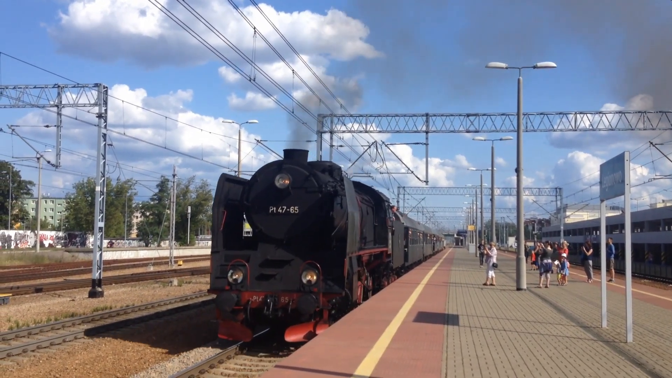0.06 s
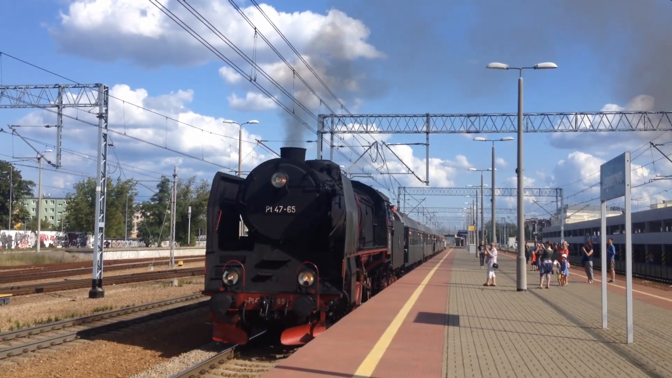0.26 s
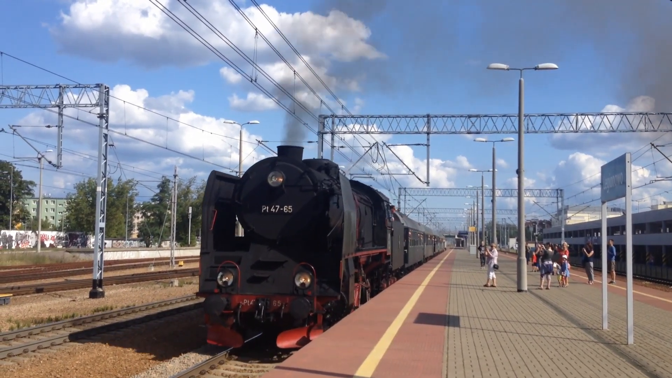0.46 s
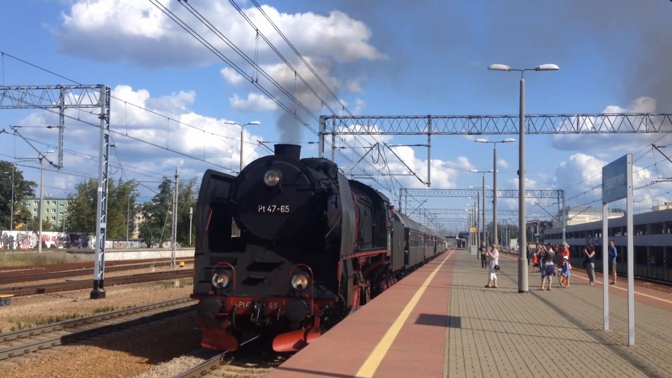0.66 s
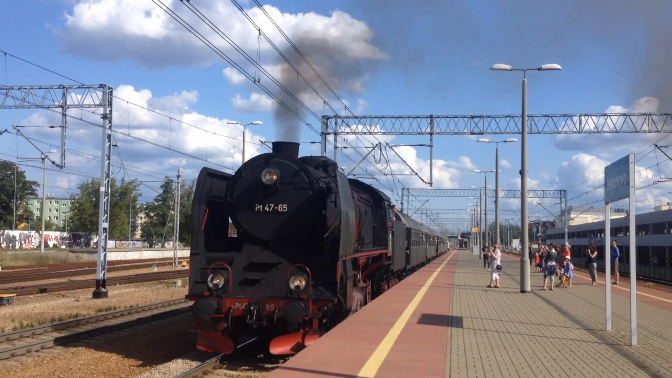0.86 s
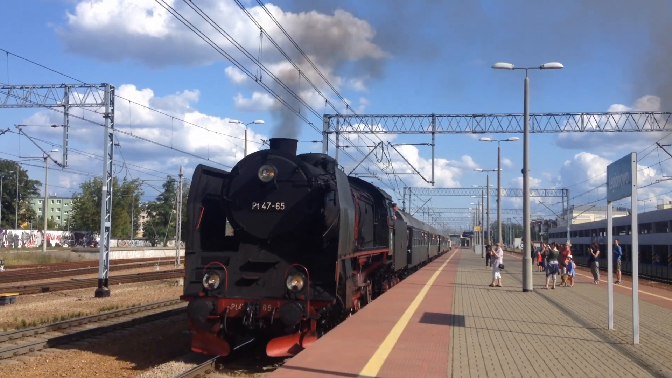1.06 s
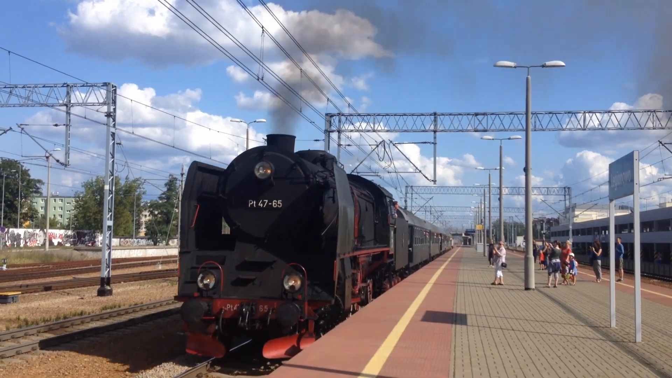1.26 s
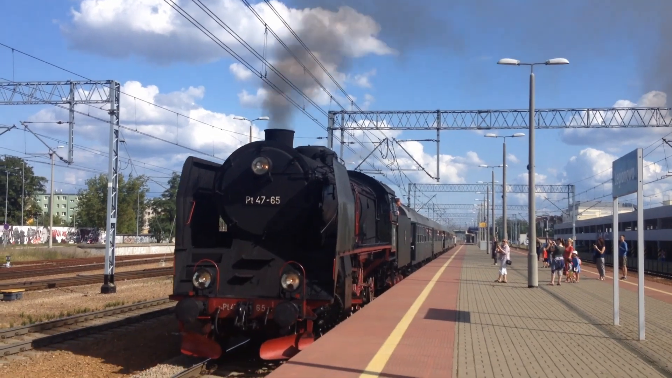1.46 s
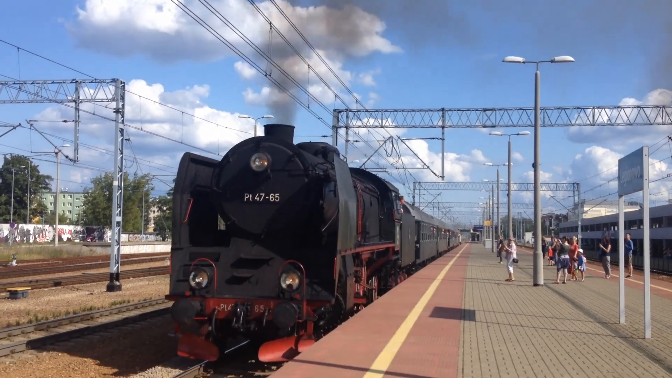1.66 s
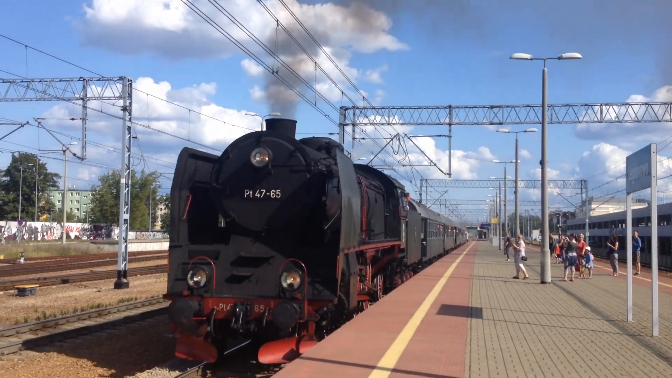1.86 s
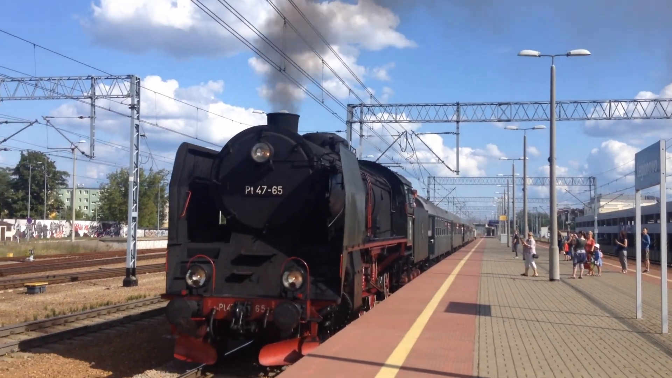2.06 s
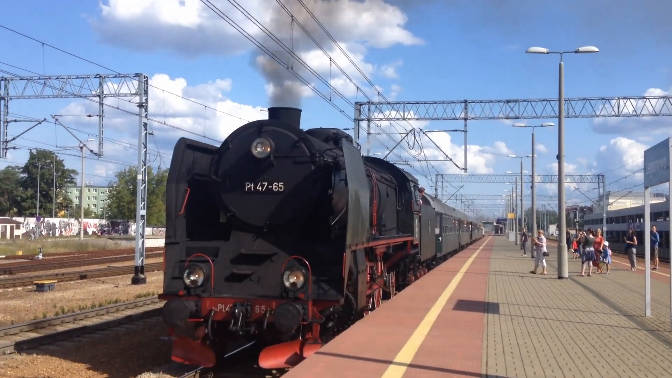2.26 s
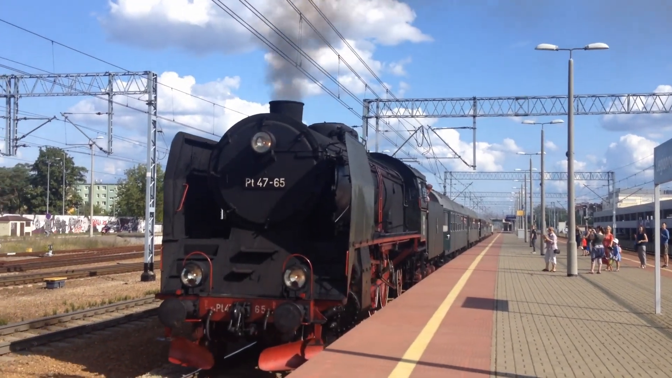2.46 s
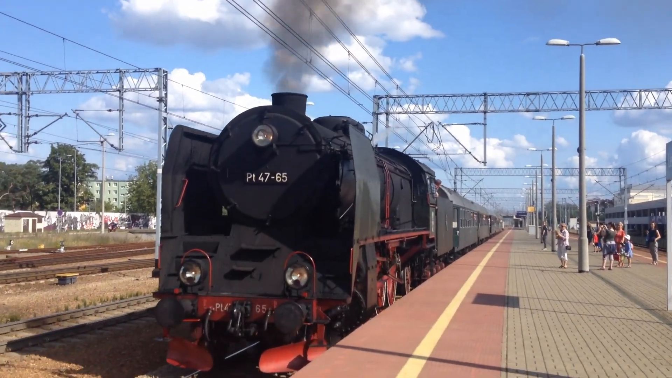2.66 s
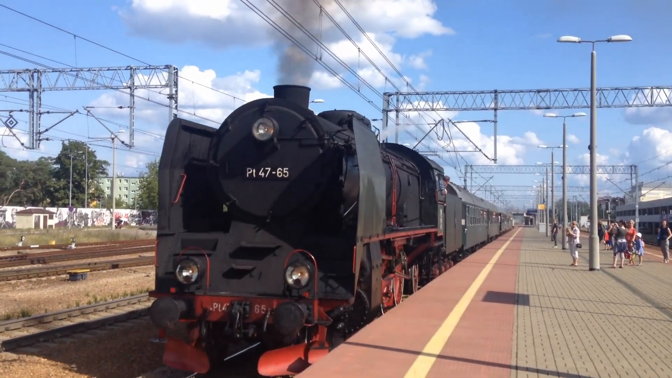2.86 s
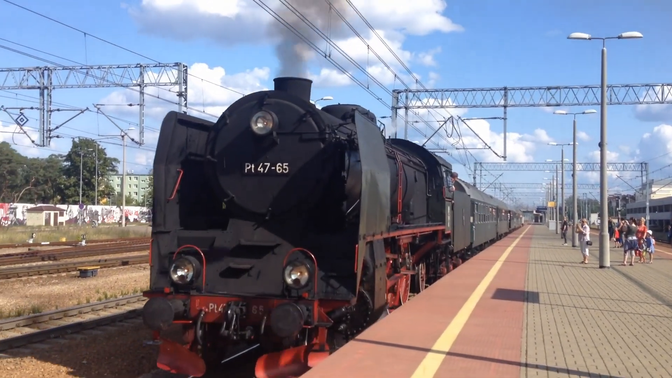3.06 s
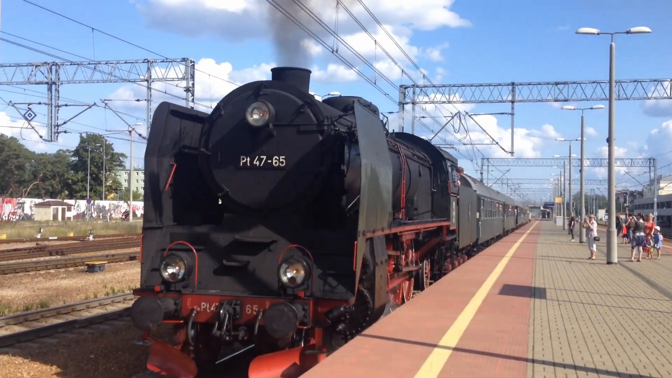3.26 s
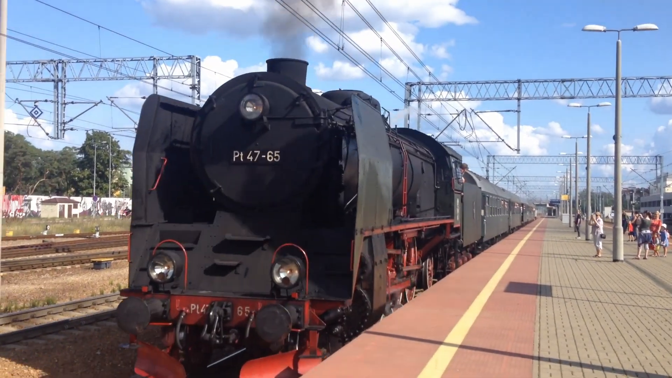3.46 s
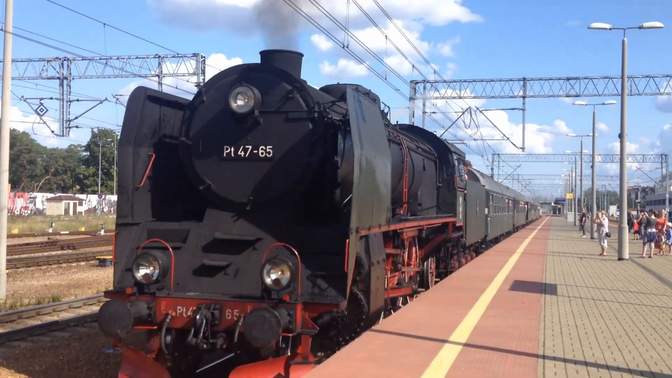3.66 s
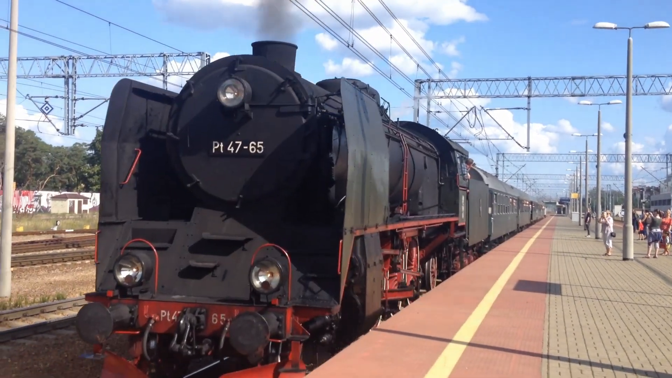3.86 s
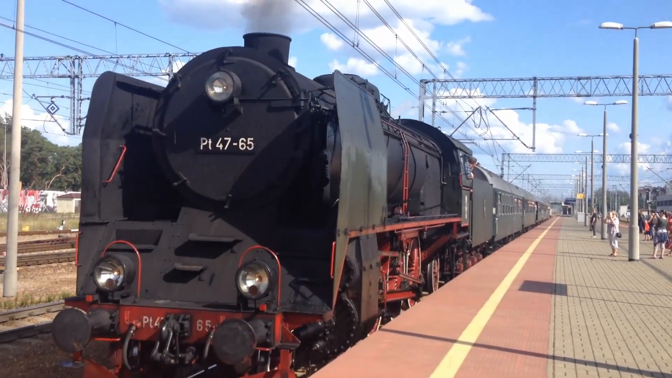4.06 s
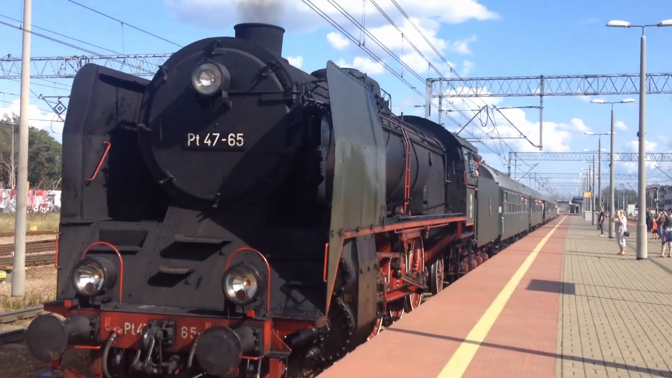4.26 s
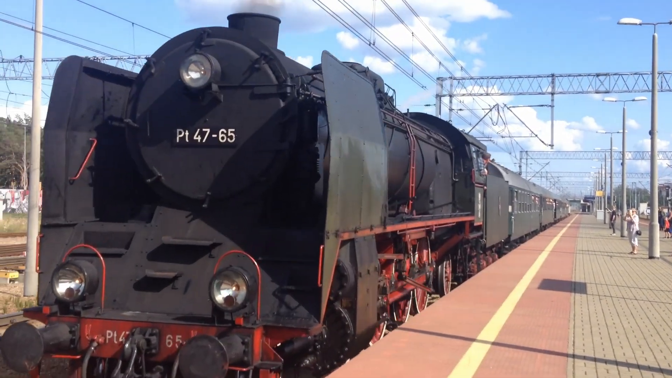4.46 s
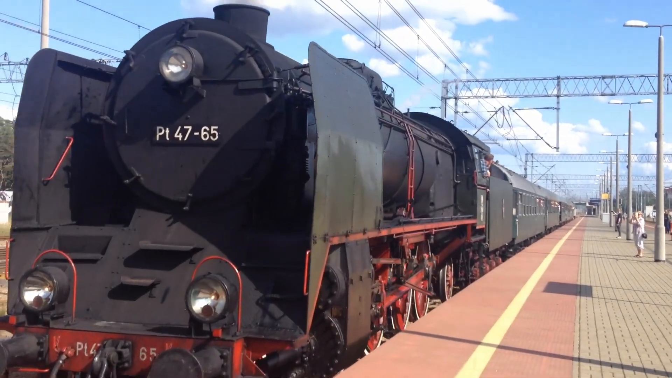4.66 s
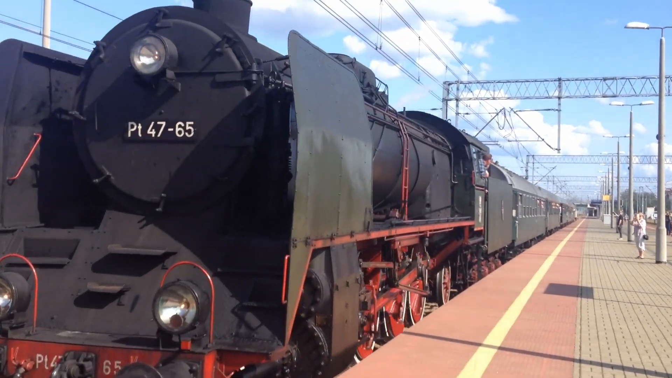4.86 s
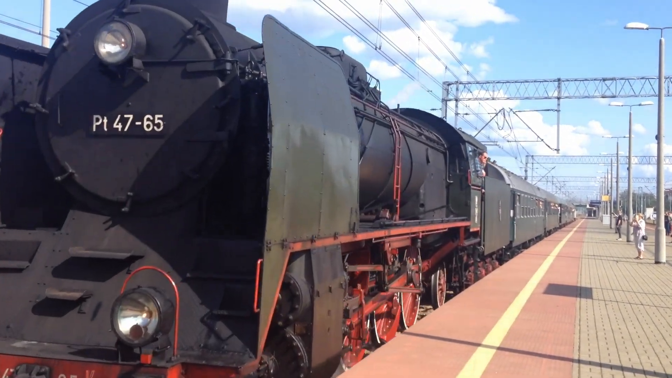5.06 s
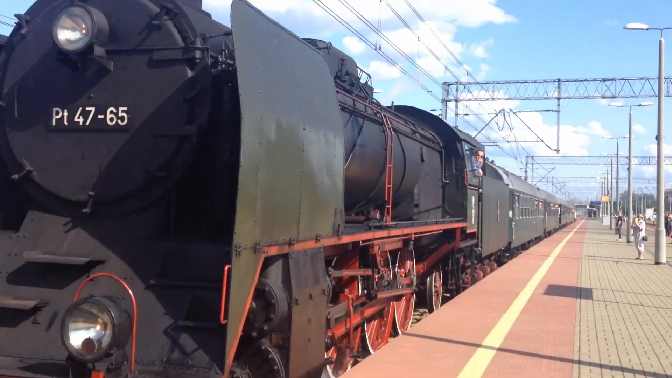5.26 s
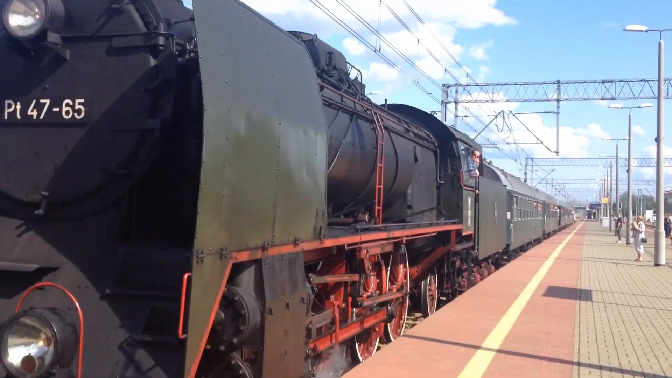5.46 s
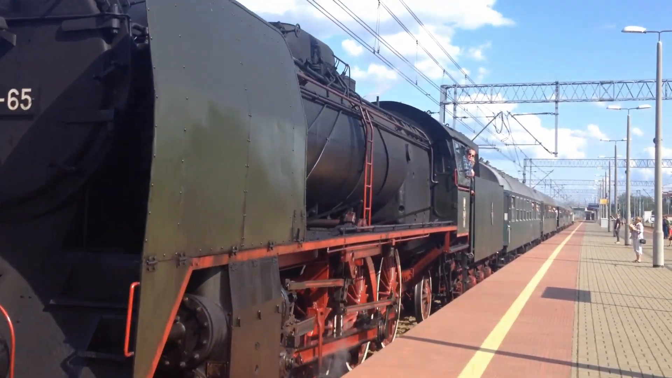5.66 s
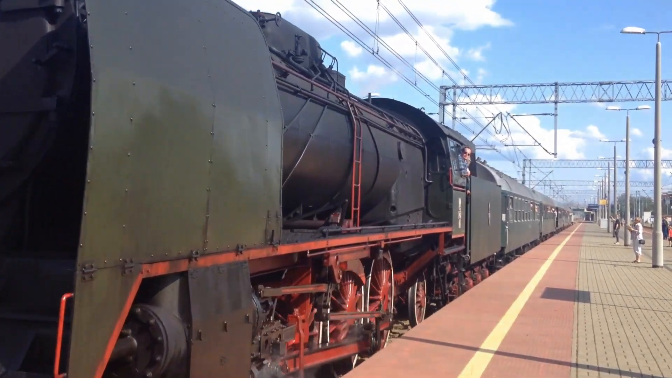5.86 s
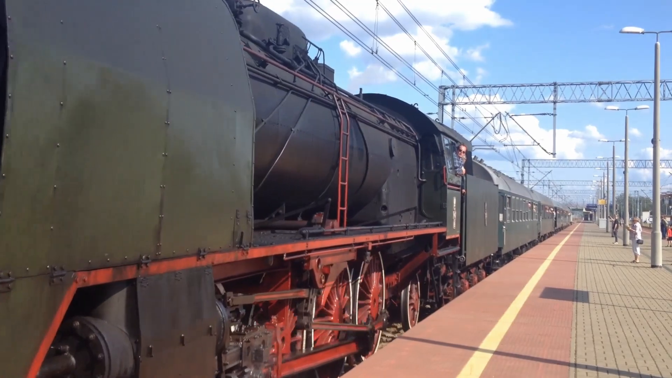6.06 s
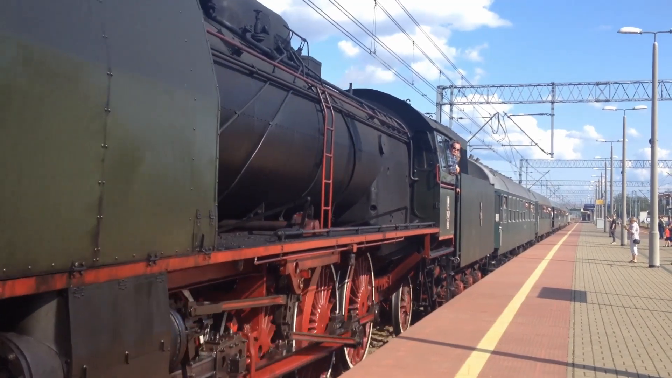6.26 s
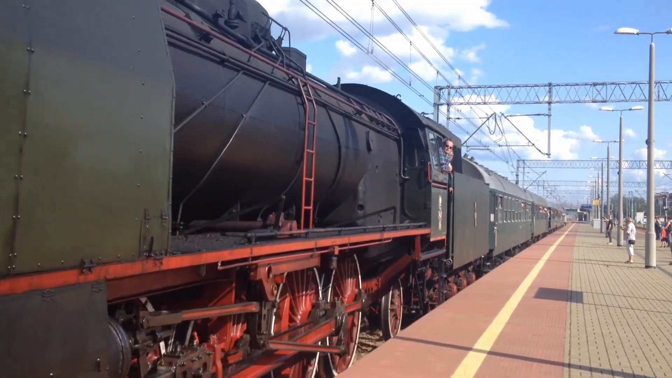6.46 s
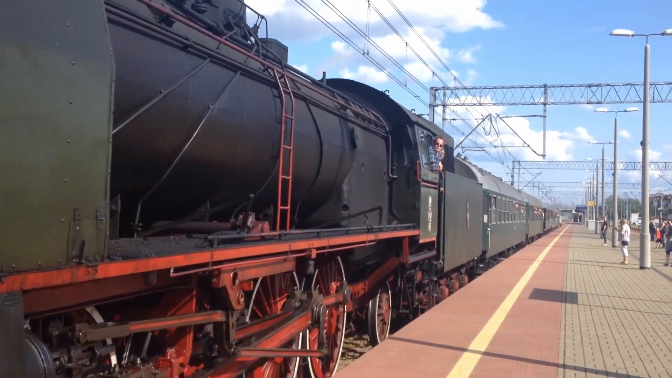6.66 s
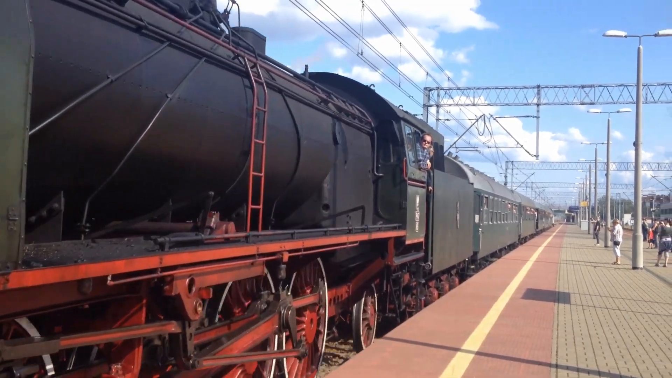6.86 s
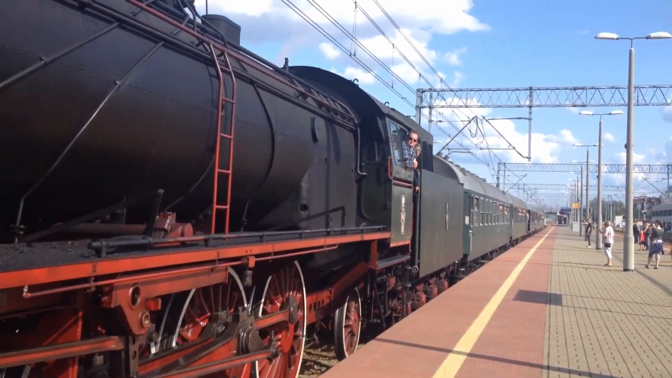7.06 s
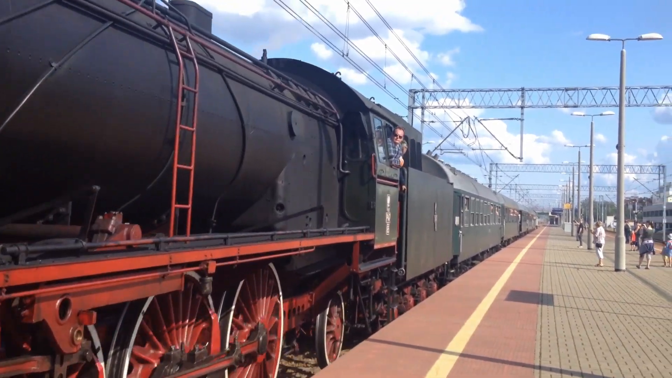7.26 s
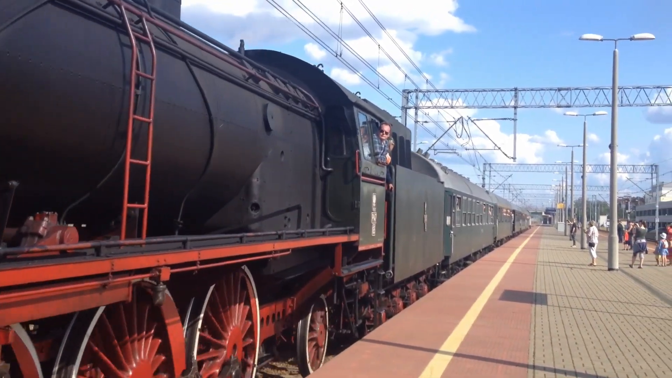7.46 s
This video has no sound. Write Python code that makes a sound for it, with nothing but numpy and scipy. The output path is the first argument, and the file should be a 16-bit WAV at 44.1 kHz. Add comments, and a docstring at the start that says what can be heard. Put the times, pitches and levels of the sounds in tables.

```python
"""Steam locomotive pulling away

An engine gathers speed along a platform and draws level with the listener, on the left channel only.
The boiler roars, the draught rumbles and leaking steam hisses, louder and brighter as it nears.
Each exhaust beat sends a turbulent jet up the chimney: a hollow boom, a throaty bark and a rasp,
thrown back by the station. A limiter dips the level after the hardest beats."""
import sys
import numpy as np
from scipy import signal
from scipy.fft import rfft, irfft
from scipy.io import wavfile
from scipy.ndimage import uniform_filter1d

SR = 44100
rng = np.random.default_rng(int(sys.argv[2]) if len(sys.argv) > 2 else 0)


def dump_mix(stems):
    """Bounce the given channels to the path in sys.argv[1] as a 16-bit WAV at rate SR."""
    frames = np.atleast_2d(stems).T  # one column per channel
    limited = np.clip(frames, -1, 1)  # hard clip at full scale
    pcm = np.round(limited * 32767).astype(np.int16)
    wavfile.write(sys.argv[1], SR, pcm)


N = 331632
TIME_S = np.arange(N) / SR


def gain_of(db):
    """Decibels to amplitude."""
    return 10 ** (np.asarray(db) / 20)


def unit_rms(x):
    """Scales to rms 1."""
    return x / np.sqrt(np.mean(x ** 2) + 1e-20)


def value_at(rows, hz):
    """Interpolates a table over log frequency."""
    row_hz, values = np.transpose(rows)
    return np.interp(np.log(hz + 1), np.log(row_hz + 1), values)


def coloured(x, spectrum):
    """Filters x by a spectrum, at rms 1."""
    hz = np.fft.rfftfreq(len(x), 1 / SR)
    return unit_rms(irfft(rfft(x) * gain_of(value_at(spectrum, hz)), len(x)))


def eddies(size, cutoff_hz):
    """Slow random unsteadiness of a flow, at rms 1."""
    hz = np.fft.rfftfreq(size, 1 / SR)
    white = rfft(rng.standard_normal(size))
    return unit_rms(irfft(white * (hz > 0) / (1 + (hz / cutoff_hz) ** 4), size))


def turbulence(spectrum, flutter_db, flutter_hz):
    """Continuous flow noise whose strength flutters."""
    return coloured(rng.standard_normal(N), spectrum) * gain_of(flutter_db * eddies(N, flutter_hz))


def resonant_noise(hz, width_hz):
    """Noise passed twice through a resonance, at rms 1."""
    b, a = signal.iirpeak(hz, hz / width_hz, fs=SR)
    once = signal.lfilter(b, a, rng.standard_normal(N))
    return unit_rms(signal.lfilter(b, a, once))


def add(mix, start_s, sound):
    """Mixes a sound in at start_s."""
    part = mix[max(round(start_s * SR), 0):][:len(sound)]
    part += sound[:len(part)]


def distance_m(t, start_m=21.8, speed_m_per_s=2.3, accel_m_per_s2=0.1286, aside_m=2.98):
    """Ground distance from the listener to the chimney of the accelerating engine."""
    return np.hypot(start_m - speed_m_per_s * t - accel_m_per_s2 * t ** 2 / 2, aside_m)


def platform_bounce(x, chimney_m=3.837, listener_m=1.5, reflected_gain=0.32):
    """Adds the platform's reflection; it lags more as the engine nears, so its comb slides down."""
    ground_m = distance_m(TIME_S)
    direct_m = np.hypot(ground_m, chimney_m - listener_m)
    bounced_m = np.hypot(ground_m, chimney_m + listener_m)
    lag_s = (bounced_m - direct_m) / 343
    return x + reflected_gain * np.interp(TIME_S - lag_s, TIME_S, x)


def cylinder_passing(span_s=0.18, centre_s=6.68):
    """Peaks at 1 as the cylinder passes the listener."""
    return np.exp(-((TIME_S - centre_s) / span_s) ** 2)


def beamed_jet(far, near, flutter_db, turn_s=4.99, turn_span_s=0.67, min_facing=0.12):
    """A steam jet beams its highs, so its colour changes as it comes to face the listener."""
    turned = 1 / (1 + np.exp((turn_s - TIME_S) / turn_span_s))
    facing = min_facing + (1 - min_facing) * turned
    far_noise = turbulence(far, flutter_db, flutter_hz=12)
    near_noise = turbulence(near, flutter_db, flutter_hz=16)
    return np.sqrt(1 - facing) * far_noise + np.sqrt(facing) * near_noise


# Steam on the approach. Each row: time in seconds, relative level in dB.
STEAM_SWELL = [(0.1, -38), (0.82, -37.5), (1.87, -34.5), (4.8, -27.5), (5.58, -26.5), (6.61, -21),
               (7.5, -20.5)]


def swell_db():
    """Steam level about its average, rising as the engine nears."""
    level_db = np.interp(TIME_S, *np.transpose(STEAM_SWELL))
    return level_db - level_db.mean()


# Fire draught. Each row: frequency in Hz, relative density in dB.
RUMBLE_SPECTRUM = [(20, -56), (50, -63), (85, -17.5), (125, -10), (170, 3), (215, -3), (280, -2), (370, -2),
                   (470, -10.5), (650, -27), (2000, -73)]


def draught_rumble():
    """Air drawn through the fire rumbles up the chimney."""
    level_db = -34 + 0.59 * swell_db()
    return gain_of(level_db) * turbulence(RUMBLE_SPECTRUM, flutter_db=1.4, flutter_hz=9.5)


# Boiler, far and near. Each row: frequency in Hz, relative density in dB.
ROAR_FAR_SPECTRUM = [(300, -33), (520, -16), (630, 1.5), (830, 1), (1000, 0.5), (1200, 1.5), (1440, -1.5),
                     (1620, 4), (1730, 6), (1850, 4), (2130, -0.5), (2480, -1.5), (2800, -9), (8000, -26)]
ROAR_NEAR_SPECTRUM = [(300, -21), (450, -6), (520, -7), (650, -2.5), (790, 2.5), (950, 1), (1200, 2),
                      (1480, -3), (1720, 3), (1920, 4.5), (2200, -1.5), (2500, -6.5), (2850, -9),
                      (3600, -12.5), (8000, -56)]


def boiler_roar():
    """The boiler roars without pause, lifting briefly as the cylinder passes."""
    level_db = -26.5 + 0.68 * swell_db() + 2 * cylinder_passing()
    return gain_of(level_db) * beamed_jet(ROAR_FAR_SPECTRUM, ROAR_NEAR_SPECTRUM, flutter_db=0.5)


# Leaking steam, far and near. Each row: frequency in Hz, relative density in dB.
HISS_FAR_SPECTRUM = [(2000, -40), (3400, -17), (4200, -3.5), (4800, 0.5), (5400, -2), (6300, -10),
                     (7500, -12), (8400, -22), (10300, -31), (12200, -29), (13200, -14.5), (15500, -26)]
HISS_NEAR_SPECTRUM = [(2000, -26), (3500, -13), (4300, -2.5), (5100, -0.5), (5420, 2.5), (5800, 1.5),
                      (6300, -2.5), (7100, -4), (8400, -14.5), (10500, -17), (12200, -14.5), (13800, -10),
                      (15500, -10)]


def cylinder_leak(mean_db=-24, passing_db=1, sizzle_hz=9000):
    """Steam hisses out around the cylinders; its top sizzle is shaded as they pass."""
    level_db = mean_db + swell_db() + passing_db * cylinder_passing()
    shelf_db = 1 - 3 * cylinder_passing(span_s=0.66)
    hiss = beamed_jet(HISS_FAR_SPECTRUM, HISS_NEAR_SPECTRUM, flutter_db=0.7)
    sizzle = signal.sosfiltfilt(signal.butter(4, sizzle_hz, "high", fs=SR, output="sos"), hiss)
    return gain_of(level_db) * (hiss + (gain_of(shelf_db) - 1) * sizzle)


def steam_ring(start_db=-46.5, fade_db_per_s=0.5):
    """A thin, unsteady ring in the steam, heard best from ahead of the engine."""
    return gain_of(start_db - fade_db_per_s * TIME_S) * resonant_noise(hz=1725, width_hz=55)


# Air column of smokebox and chimney, the chimney's broad upper resonance, the jet's rough edge.
# Each row: frequency in Hz, relative density in dB.
BOOM_SPECTRUM = [(40, -64), (90, -27), (125, -20), (155, -5.5), (176, 4.5), (197, -6), (235, -9),
                 (330, -9.5), (1000, -65)]
BARK_SPECTRUM = [(60, -70), (140, -16), (200, -11.5), (245, 5), (300, -4), (345, 4), (400, -5),
                 (480, -24.5), (700, -26), (2000, -82)]
RASP_SPECTRUM = [(25, -44), (60, -25), (105, -18), (200, -36), (430, 7.5), (520, -1.5), (640, 5.5),
                 (820, 4), (1000, -1), (1400, -2.5), (1850, -3), (2400, -7), (3100, -19), (4800, -7.5),
                 (10000, -45)]
LEAD_S = 0.03  # onset ahead of the valve opening


def chuff(level_db, bark_ratio, boom_db, thump_db, bark_db=2.5, rasp_db=1.05):
    """The valve cracks open, cylinder pressure sags, the valve shuts; the lumpy jet drives the chimney."""
    t = np.arange(SR // 2) / SR - LEAD_S
    crack_s, peak_s, closing_s, shut_s, end_s = 0.015, 0.078, 0.15, 0.168, 0.268
    jet_db = np.interp(t, [t[0], crack_s, peak_s, closing_s, shut_s, end_s],
                       [-42, -6.5, 0, -7.5, -16, -60])
    lumps_db = 1.77 * eddies(len(t), cutoff_hz=26)
    low, middle, high = gain_of(jet_db + lumps_db) * rng.standard_normal((3, len(t)))
    # The narrow boom builds late; the bark speaks first, while the jet is fastest.
    lag_s, bark_decay_s, thump_width_s = 0.012, 0.5, 0.015
    boom = coloured(np.interp(t - lag_s, t, low), BOOM_SPECTRUM)
    bark_spectrum = [(hz * bark_ratio, db) for hz, db in BARK_SPECTRUM]
    bark = coloured(middle * np.exp(-t / bark_decay_s), bark_spectrum)
    rasp = coloured(high, RASP_SPECTRUM)
    jet = gain_of(boom_db) * boom + gain_of(bark_db) * bark + gain_of(rasp_db) * rasp
    open_share = closing_s * SR / len(t)
    # One slow pressure swing at the height of the beat.
    swing = (t - peak_s - lag_s) / thump_width_s
    thump = gain_of(thump_db) * swing * np.exp(-swing ** 2 / 2)
    return gain_of(level_db) * jet * np.sqrt(open_share) + thump


# Exhaust beats. Each row: valve opening in seconds, level in dB, bark pitch ratio.
EXHAUST_BEATS = [(.212, -31, .82), (.856, -28.5, 1.06), (1.503, -25, 1.13), (2.042, -28, 0.99),
                 (2.668, -24.5, 1.01), (3.23, -21, 1), (3.798, -20.5, 1.02), (4.275, -25.5, 0.94),
                 (4.82, -22, 0.91), (5.33, -21, 0.808), (5.826, -18, 0.88), (6.266, -21.5, 0.956),
                 (6.766, -20.5, 1.02), (7.229, -19.5, 1.03)]


def exhaust(beats_per_turn=4, thump_reach_m=9.2):
    """Four beats to a wheel turn, the fourth weak and hollow; hard beats close by also thump."""
    beats = np.zeros(N)
    hardest_db = max(row[1] for row in EXHAUST_BEATS)
    for number, (start_s, level_db, bark_ratio) in enumerate(EXHAUST_BEATS, 1):
        weak = number % beats_per_turn == 0
        boom_db = 6 if weak else 4
        effort_db = 0.35 * (level_db - hardest_db)
        distance_loss_db = 20 * np.log10(1 + (distance_m(start_s) / thump_reach_m) ** 4)
        thump_db = (-10 if weak else 4) + effort_db - distance_loss_db
        add(beats, start_s - LEAD_S, chuff(level_db, bark_ratio, boom_db, thump_db))
    return beats


# Open-air tail. Each row: frequency in Hz, time to fall 60 dB in seconds.
STATION_T60 = [(150, 0.49), (500, 1), (2000, 0.27), (8000, 0.45)]
# Reflections off train, masts and roofs. Each row: delay in seconds, gain in dB.
STATION_ECHOES = [(.034, -15), (0.073, -14.5), (.118, -18)]


def station_reflections(x, tail_db=-16.5, taps_per_s=2000):
    """The station throws back a few distinct echoes and a thin tail."""
    taps = rng.choice([-1., 1.], SR) * (rng.random(SR) < taps_per_s / SR)
    taps *= np.arange(SR) > SR // 40  # 25 ms predelay
    hz, t, frames = signal.stft(taps, SR, nperseg=256)
    decay_db = -60 * t / value_at(STATION_T60, hz)[:, None]
    _, tail = signal.istft(frames * gain_of(decay_db), SR, nperseg=256)
    response = gain_of(tail_db) * tail / np.linalg.norm(tail)
    for delay_s, echo_db in STATION_ECHOES:
        add(response, delay_s, gain_of([echo_db]))
    return signal.fftconvolve(x, response)[:N]


# Gulps of steam within beats. Each row: centre in seconds, length in seconds, pitch in Hz, level in dB.
STEAM_GULPS = [(.922, 0.1, 171.8, -13), (1.6, .15, 183.4, -13), (2.12, .11, 176, -17),
               (3.852, .07, 363, -5.5), (4.302, 0.059, 374, -15.5), (4.943, 0.046, 277, -7),
               (5.395, 0.085, 243, -7.5), (7.39, .0593, 178, -2)]


def chimney_hoots(waver_depth=0.027, waver_hz=73):
    """A gulp of steam locks onto one chimney resonance for a few wavering cycles."""
    hoots = np.zeros(N)
    for centre_s, length_s, pitch_hz, level_db in STEAM_GULPS:
        size = round(length_s * SR)
        hz = pitch_hz * (1 + waver_depth * eddies(size, waver_hz))
        cycles = np.cumsum(hz) / SR + rng.random()
        envelope = gain_of(level_db) * np.hanning(size)
        add(hoots, centre_s - length_s / 2, envelope * np.sin(2 * np.pi * cycles))
    return hoots


def steam_spit(centre_s=5.9, span_s=0.044, level_db=-21):
    """One short, shrill spurt of steam as the cylinder comes close."""
    envelope = gain_of(level_db) * np.exp(-((TIME_S - centre_s) / span_s) ** 2)
    return envelope * resonant_noise(hz=5670, width_hz=220)


def scene():
    """Exhaust and its echoes over the steady steam; the right channel is silent."""
    beats = platform_bounce(exhaust()) + chimney_hoots()
    echoes = station_reflections(beats)
    steady = platform_bounce(draught_rumble()) + boiler_roar() + cylinder_leak() + steam_ring()
    left = beats + echoes + steady + steam_spit()
    return np.array([left, np.zeros(N)])


def limiter(x, threshold_db=-8, slope=0.39, release_db_per_s=5, smoothing_hz=12):
    """Turns down quickly on the hardest beats and recovers slowly, so the hiss dips afterwards."""
    power_db = 10 * np.log10(abs(uniform_filter1d(x[0] ** 2, size=1300)) + 1e-12)
    release_db = release_db_per_s * TIME_S
    held_db = np.maximum.accumulate(power_db + release_db) - release_db
    over_db = np.maximum(held_db - threshold_db, 0)
    b, a = signal.butter(2, smoothing_hz, fs=SR)
    return x * gain_of(-slope * signal.lfilter(b, a, over_db))


def record(dry, low_cut_hz=65, high_cut_hz=15400):
    """Limiter, low cut, clipping at full scale, high cut."""
    low_cut = signal.butter(4, low_cut_hz, "high", fs=SR, output="sos")
    high_cut = signal.firwin(1023, high_cut_hz, window=("kaiser", 9), fs=SR)
    clipped = np.clip(signal.sosfilt(low_cut, limiter(dry)), -1, 1)
    return signal.oaconvolve(clipped, high_cut[None], "same", axes=1)


dry = scene()
out = record(dry)
dump_mix(out)
```